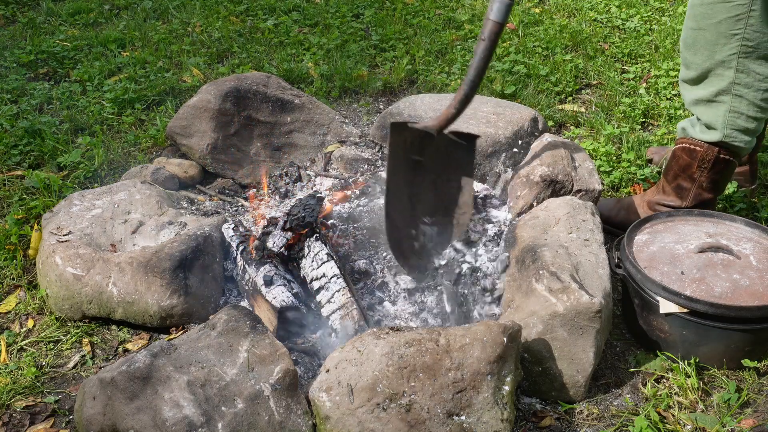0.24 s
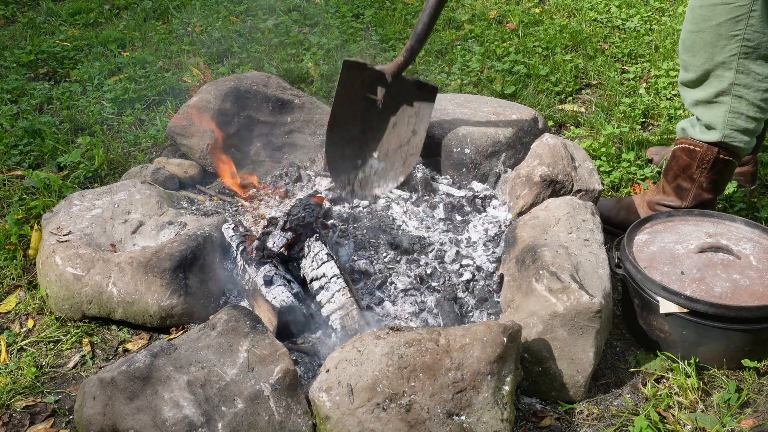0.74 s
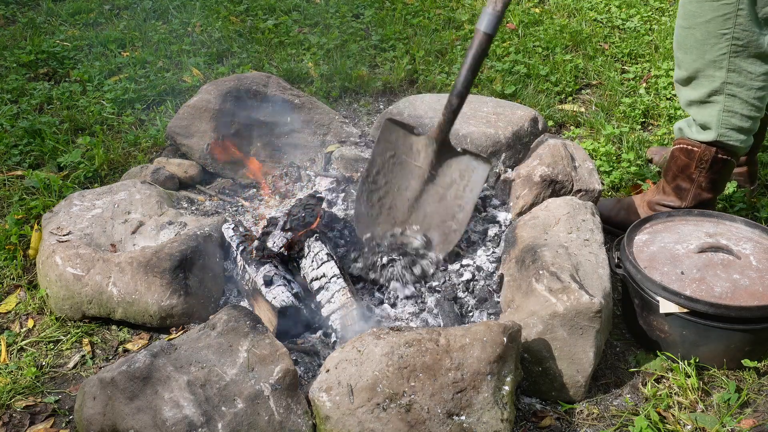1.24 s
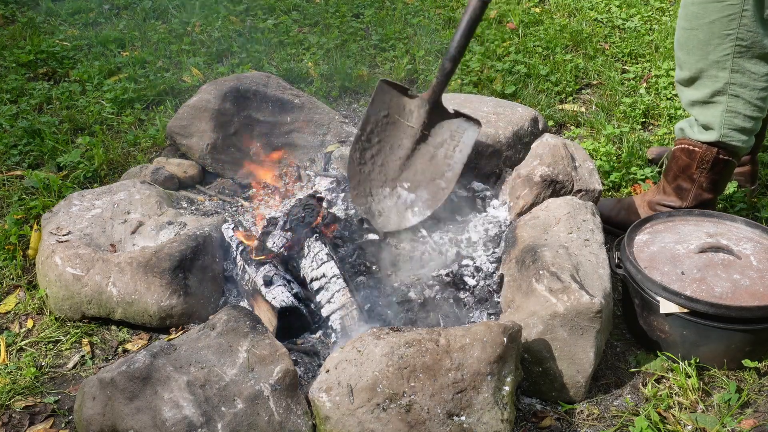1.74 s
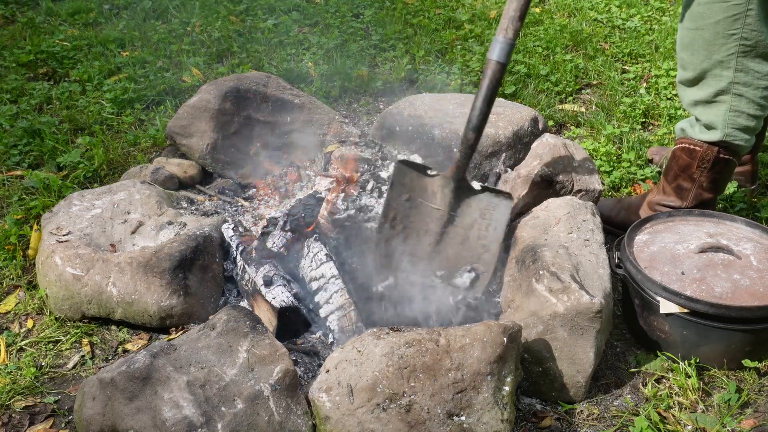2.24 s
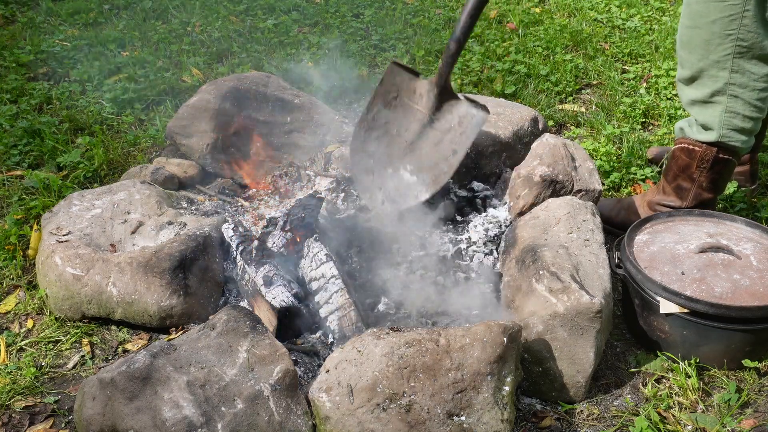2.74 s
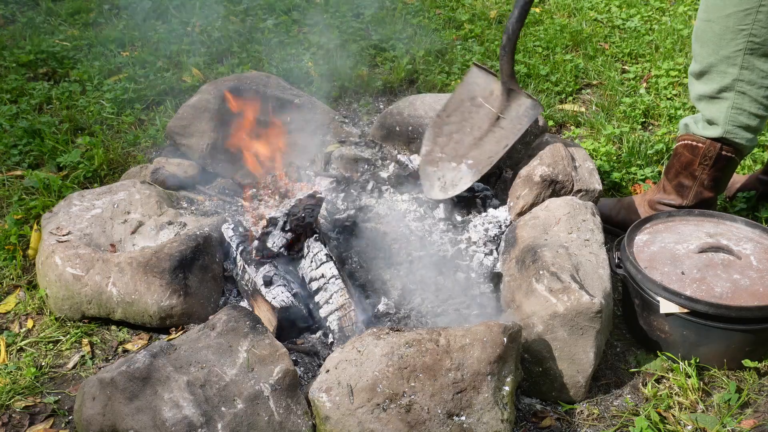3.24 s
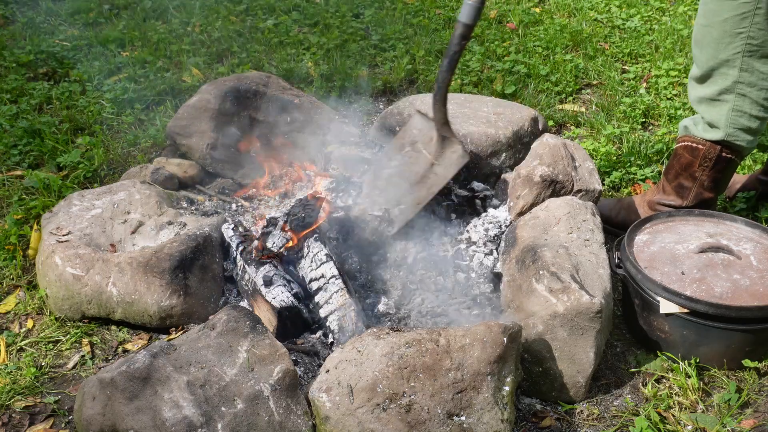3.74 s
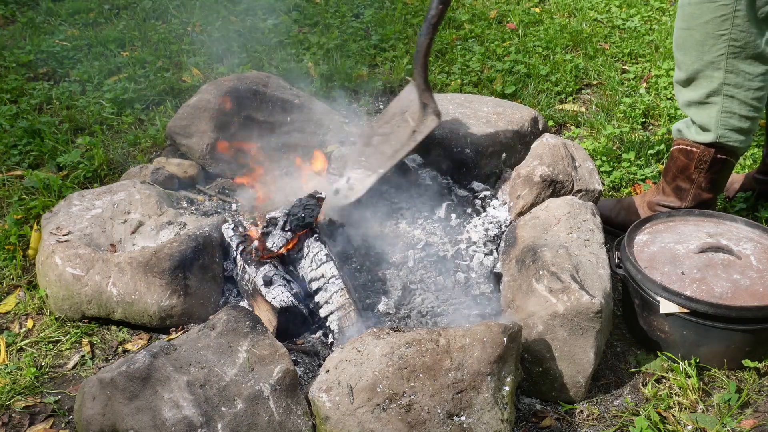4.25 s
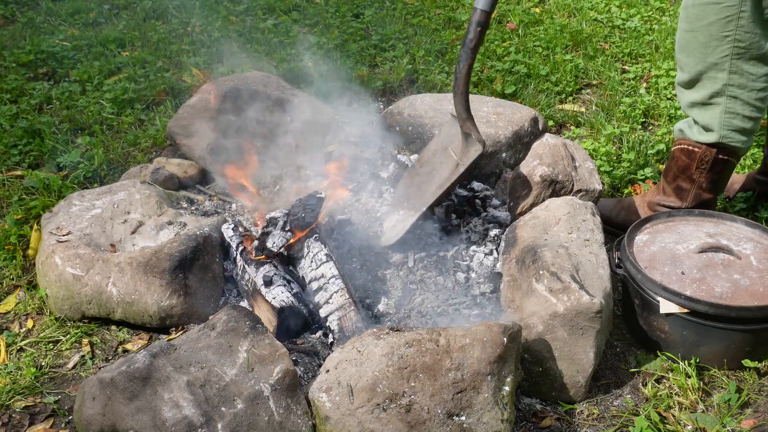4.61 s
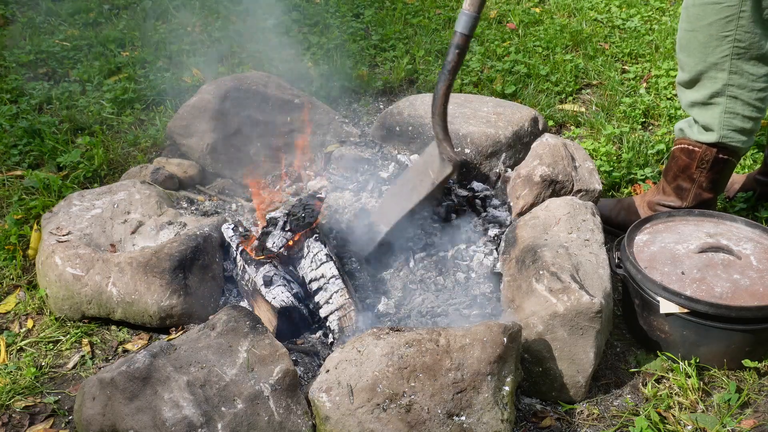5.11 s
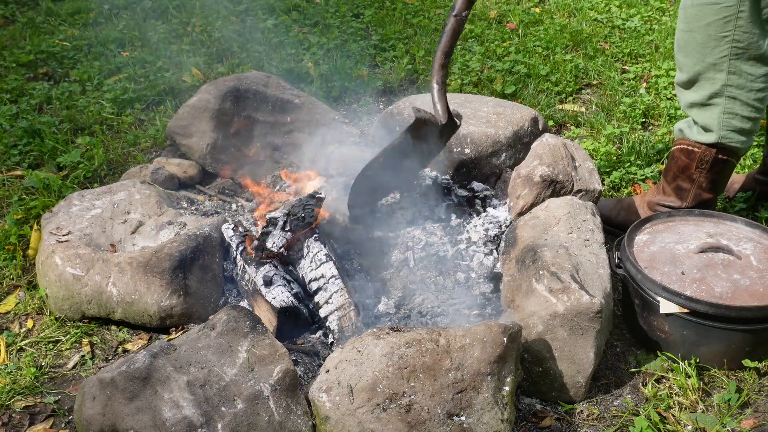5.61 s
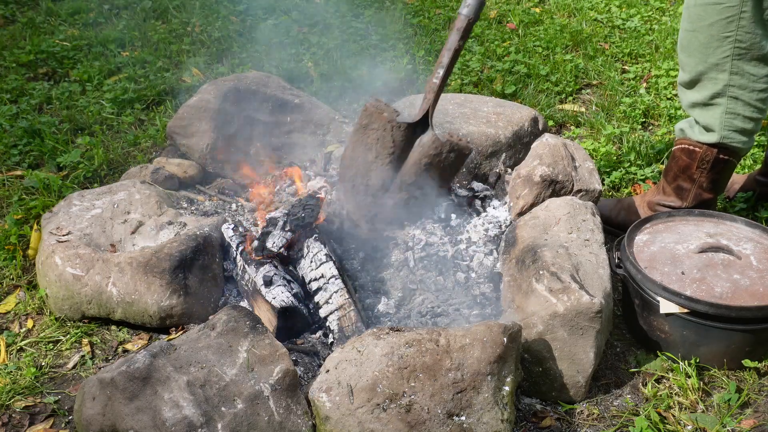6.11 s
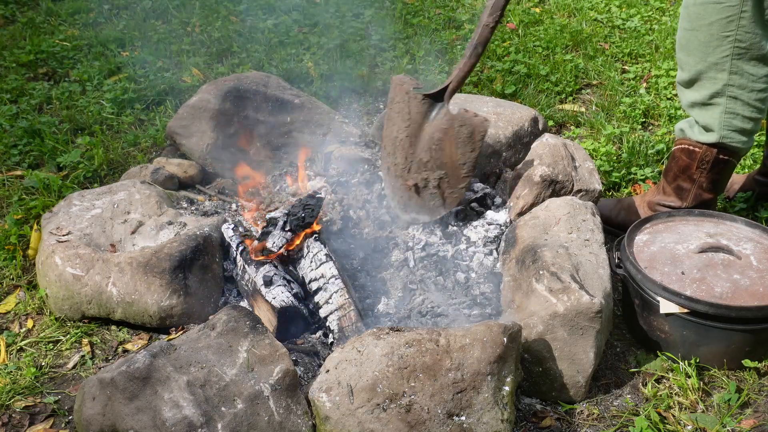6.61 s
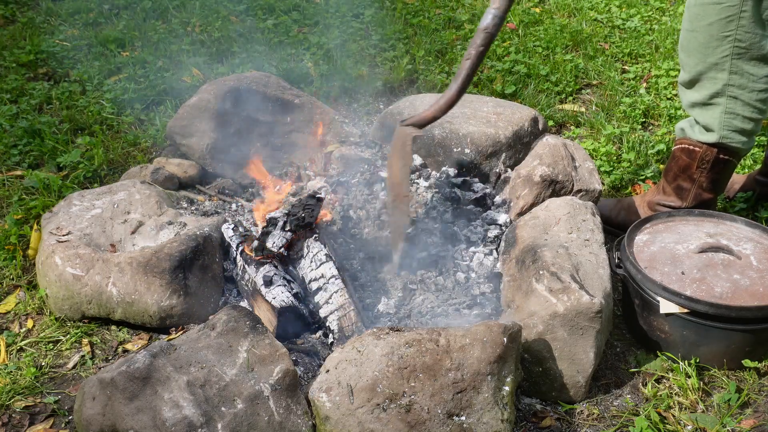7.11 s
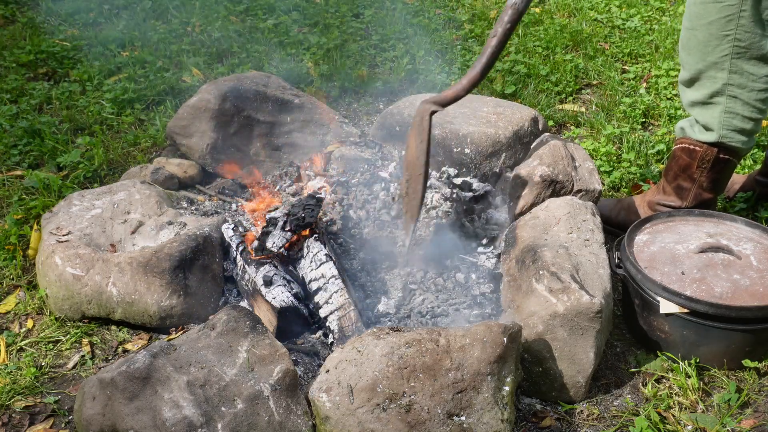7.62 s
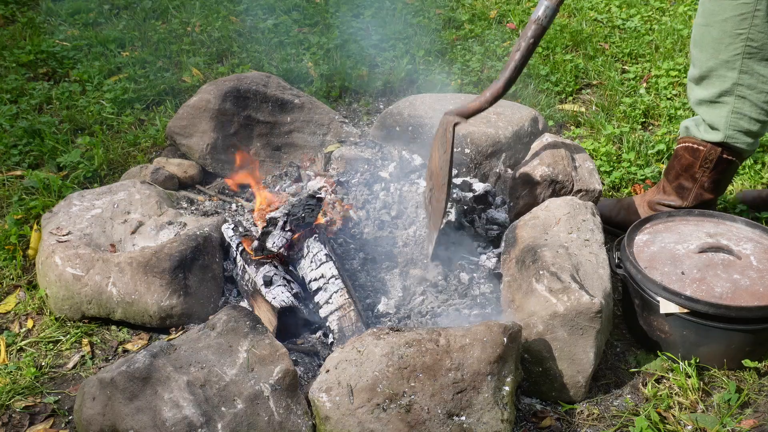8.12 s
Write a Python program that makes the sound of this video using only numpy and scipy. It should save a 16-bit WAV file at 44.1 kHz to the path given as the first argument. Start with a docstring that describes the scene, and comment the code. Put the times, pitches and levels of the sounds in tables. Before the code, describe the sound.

Outdoors, insects keep up a high trill over a soft hush while wind thumps and rumbles on the microphone. In front, a metal shovel works through coals in uneven, gritty strokes, with lumps knocking on the ringing blade and bits of charcoal tinkling. The digging starts hard and turns gentler, broken by short pauses and dry cracks from the embers. Around the middle, a distant bird and a faint whistle come and go.

```python
"""Outdoors at a stone fire ring, a steel spade is dragged and jabbed through ash and charcoal.
Crushed coals rattle the blade, lumps knock on it, and it rings on when it lifts free. Bits of
charcoal tinkle, and the embers crack, sizzle and tick. Insects trill in the grass with their wings,
a far bird and a faint whistle come and go, and gusts rumble on the microphone over a soft hush."""
import sys
import numpy as np
from scipy import signal
from scipy.fft import rfft, irfft, next_fast_len
from scipy.io import wavfile
from scipy.ndimage import map_coordinates

SR = 44100
rng = np.random.default_rng(int(sys.argv[2]) if len(sys.argv) > 2 else 0)


def to_wav(s):
    """Save 16-bit WAV."""
    ch = np.atleast_2d(s).T  # columns
    pcm = np.round(np.clip(ch, -1, 1) * 32767)  # PCM
    wavfile.write(sys.argv[1], SR, pcm.astype(np.int16))


N = 368674
TOP_HZ = 15950


def amp(db):
    """Turn decibels into a gain to multiply by."""
    return 10 ** (np.asarray(db) / 20)


def unit(x):
    """Scale each row to an average (rms) level of 1."""
    return x / np.sqrt(np.mean(np.abs(x) ** 2, axis=-1, keepdims=True) + 1e-20)


def colour(points, hz):
    """A tone curve through (Hz, dB) points, silent beyond its ends."""
    point_hz, db = np.transpose(points)
    return amp(np.interp(np.log(hz + 1), np.log(point_hz), db, left=-120, right=-120))


def hump(hz, centre_hz, octaves):
    """A tone curve that favours the frequencies near a centre."""
    return 1 / (1 + (np.log2((hz + 1) / centre_hz) / octaves) ** 2)


def wobble(rate, n):
    """A smooth curve through `rate` random values a second."""
    return map_coordinates(rng.standard_normal(int(n * rate / SR) + 4), [np.arange(n) * rate / SR])


def filtered(x, response):
    """Shape x with a tone curve that keeps white noise equally strong; adds room for a tail."""
    size = next_fast_len(x.shape[-1] + SR // 3)
    return irfft(rfft(x, size) * unit(response(np.fft.rfftfreq(size, 1 / SR))), size)


def add(track, s, x):
    """Mix x into the track at s seconds, dropping what falls outside."""
    start = round(s * SR)
    x = x[..., max(-start, 0):]
    part = track[..., max(start, 0):][..., :x.shape[-1]]
    part += x[..., :part.shape[-1]]


def spread(mid, side, side_db, pan_db):
    """Make left and right from a shared part (mid) and an opposed part (side)."""
    side = amp(side_db) * side
    return np.array([(mid + side) * amp(pan_db / 2), (mid - side) * amp(-pan_db / 2)])


def rush(spectrum, side_db, pan_db):
    """Steady stereo noise with the given tone curve."""
    mid, side = filtered(rng.standard_normal((2, N)), lambda hz: colour(spectrum, hz))[:, :N]
    return spread(mid, side, side_db, pan_db)


def swell(t, rise_s, fall_s, drop_db=26.5, roundness=1.22):
    """A gain of 1 at t = 0 that is drop_db lower one rise before and one fall after."""
    return amp(-drop_db * np.maximum(-t / rise_s, t / fall_s) ** roundness)


def swells(rows):
    """Join overlapping swells into one gain curve."""
    t = np.arange(0, N, 32) / SR
    s, db, rise_s, fall_s = np.transpose(rows)[..., None]
    joined = np.linalg.norm(amp(db) * swell(t - s, rise_s, fall_s), axis=0)
    return np.interp(np.arange(N) / SR, t, joined)


def grains(n, rate, scatter_db):
    """Tiny random impacts of uneven size, about `rate` a second."""
    sizes = amp(scatter_db * np.clip(rng.standard_normal(n), -2, 2)) * rng.choice([-1, 1], n)
    return unit(sizes * (rng.random(n) < rate / SR))


def patchy(x, depth_db, clump_s=0.012, clump_hz=700):
    """Each clump of coal breaks with its own tone: a random gain over time and frequency."""
    spectra = signal.stft(x, nperseg=256)[2]
    step = np.array([SR / 256 / clump_hz, 128 / SR / clump_s])
    grid = np.indices(spectra.shape) * step[:, None, None]
    patches = map_coordinates(rng.standard_normal(grid[:, -1, -1].astype(int) + 2), grid, order=1)
    gain = amp(depth_db * np.clip(patches, -1.5, 1.5))
    return signal.istft(spectra * gain / np.sqrt(np.mean(gain ** 2)), nperseg=256)[1][:len(x)]


def chips(n, rate, pitch_hz, pitch_spread, cycles):
    """Charcoal chips ring briefly at random times, each at its own pitch."""
    count = int(rate * n / SR) + 1
    pitch, size, life = rng.standard_normal((count, 3)).T[..., None]
    start = (n * rng.random((count, 1))).astype(int)
    hz = np.minimum(pitch_hz * np.exp(pitch_spread * pitch), TOP_HZ)
    age = np.arange(SR // 50)
    turns = hz * age / SR
    fade = np.exp(-turns / (cycles * np.exp(0.079 * life)))
    rings = amp(3.9 * np.clip(size, -2, 2)) * np.sin(2 * np.pi * turns) * fade
    return unit(np.bincount((start + age).ravel(), rings.ravel(), minlength=n)[:n])


def ring(hz, db, t60):
    """One fading tone. Its ring time, t60, is the seconds it takes to drop 60 dB."""
    t = np.arange(SR // 3) / SR
    return amp(db - 60 * t / t60) * np.sin(2 * np.pi * hz * t)


# The wind between gusts. Each row: time in seconds, strength in dB.
BREEZE = [(0, -26), (.6, -46.5), (1.7, -63), (2.6, -49), (3.1, -62), (3.5, -51), (4.05, -70), (4.7, -40.5),
          (5.8, -40.5), (7, -35.5), (7.5, -43.5), (8.36, -36.5)]
# Gusts. Each row: peak time in seconds, strength in dB, rise and fall in seconds.
GUSTS = [(.13, -28.5, 0.29, 0.55), (.8, -27, 0.1, 0.24), (1.35, -28, 0.4, 0.35), (1.88, -43.5, 0.35, 0.61),
         (2.21, -37.5, 0.16, 0.082), (3.37, -36.5, 0.043, 0.037), (3.62, -42, 0.14, 0.22),
         (4.24, -43.5, 0.13, 0.17), (4.52, -37.5, 0.22, 0.33), (4.9, -33, 0.37, 0.69),
         (5.43, -38, 0.18, 0.14), (6.02, -36, 0.2, 0.49), (6.45, -27.5, 0.2, 0.46), (6.73, -23, 0.055, 0.2),
         (7.28, -32, 0.47, 0.23), (8, -28, 1, 1)]
# The tone of steady wind. Each row: frequency in Hz, relative level in dB.
RUMBLE_TONE = [(15, -43), (25, -16), (50, 3), (100, 5), (190, -13), (250, -25), (450, -41)]
# The tone of eddies, the swirls in hard gusts. Each row: frequency in Hz, relative level in dB.
EDDY_TONE = [(50, -20), (110, 6), (185, 2.5), (260, -10.5), (400, -24), (700, -57)]
def wind(rumble_db=-43, rumble_growth=0.73, eddy_db=-49, eddy_growth=1.29, flutter_db=2.5):
    """Gusts ride on the breeze and rumble on the microphone; hard ones add higher-pitched eddies."""
    breeze_db = np.interp(np.arange(N) / SR, *np.transpose(BREEZE)) - 1
    strength_db = 20 * np.log10(np.hypot(amp(breeze_db), swells(GUSTS)))
    excess_db = strength_db + flutter_db * wobble(25, N) + 42  # above a light wind of -42 dB
    rumble = amp(rumble_db + rumble_growth * excess_db) * rush(RUMBLE_TONE, side_db=-22, pan_db=0)
    eddies = amp(eddy_db + eddy_growth * excess_db) * rush(EDDY_TONE, side_db=-17.5, pan_db=-1)
    return rumble + eddies


# The tone of the hush. Each row: frequency in Hz, relative level in dB.
AIR_TONE = [(20, 8.5), (60, 19.5), (120, 11), (220, 12.5), (400, 3.5), (1000, 0), (2000, 1), (3400, 2.5),
            (5300, -3), (6300, -7.5), (9000, -15.5), (15500, -11.5)]
# Its stereo width. Each row: frequency in Hz, level of the side against the mid in dB.
AIR_WIDTH = [(20, -34), (300, -8), (1500, -7.5), (3000, -7.5), (6000, 2.5), (16000, 2)]
def air(air_db=-52.5):
    """The hush of the open air, widest in the treble."""
    mid, side = filtered(rng.standard_normal((2, N)), lambda hz: colour(AIR_TONE, hz))
    width = colour(AIR_WIDTH, np.fft.rfftfreq(len(side), 1 / SR))
    side = irfft(rfft(side) * width, len(side))
    return amp(air_db) * np.array([mid + side, mid - side])[:, :N]


def trill(strokes_per_s, depth):
    """Wing strokes make the level pulse at a slightly unsteady rate."""
    turns = np.cumsum(strokes_per_s * (1 + 0.069 * wobble(4.5, N))) / SR
    return unit(1 + depth * np.sin(2 * np.pi * turns))


# The tones of the two insect choruses. Each row: frequency in Hz, relative level in dB.
CRICKET_TONE = [(3500, -37), (3950, -6.5), (4150, 4.5), (4350, 3), (4600, -8), (5200, -15.5)]
KATYDID_TONE = [(6000, -24.5), (6750, -10.5), (7150, 0), (7450, 4), (8050, 0.5), (8300, -8.5),
                (8600, -21.5), (9500, -30)]
def insects(cricket_db=-53, katydid_db=-46):
    """Crickets and higher-pitched katydids trill steadily in the grass."""
    drift = amp(0.7 * wobble(6, N))
    crickets = rush(CRICKET_TONE, side_db=-10, pan_db=-3.5) * trill(strokes_per_s=75, depth=0.11)
    katydids = rush(KATYDID_TONE, side_db=-5, pan_db=-3) * trill(strokes_per_s=51, depth=0.092)
    return crickets * drift * amp(cricket_db) + katydids * amp(katydid_db)


# The blade's natural tones. Each row: pitch in Hz, dB above the crunch, ring time in seconds.
BLADE_MODES = [(720, 3.5, 0.14), (815.4, 10.5, 0.29), (834.5, 15.5, 0.15), (1191, 5.5, 0.14),
               (1342, 4, 0.078), (1445, 6, 0.12), (1573, 6.5, 0.086), (1629, 9, 0.1), (1750, 12.5, 0.095),
               (1822, 15, 0.24), (1926, 10, 0.084), (2113, 10.5, 0.17), (2383, 3, 0.086), (2500, 8, 0.14),
               (2707, 11, 0.17), (2736, 6.5, 0.1), (2884, 4.5, 0.037), (2960, 10, 0.09), (3278, 9.5, 0.1),
               (3580, 5, 0.18), (3805, 2, 0.1), (4570, 7, 0.066)]
# The dry crunch of coal. Each row: frequency in Hz, relative level in dB.
CRUNCH_TONE = [(150, 11.5), (420, 0), (650, 0), (1000, -4), (1500, -3.5), (2300, -3.5), (3000, -2),
               (4000, 1.5), (5200, -4), (7000, -9), (10000, -10.5), (16000, -21)]
def blade(vary_db=2.5, detune=0.0029):
    """A tone curve of crunch and ringing steel: the contact spot varies its levels, ash its pitches."""
    modes = []
    for pitch, db, t60 in BLADE_MODES:
        pitch *= 1 + detune * rng.standard_normal()
        gain = amp(db + vary_db * rng.standard_normal())
        width_hz = np.log(1000) / np.pi / t60
        modes.append((pitch, gain, width_hz))

    def response(hz):
        ringing = sum(gain * 1j * hz * width / (pitch ** 2 - hz ** 2 + 1j * hz * width)
                      for pitch, gain, width in modes)
        return colour(CRUNCH_TONE, hz) * (1 + ringing)
    return response


# Pushes of the spade. Each row: time of the hardest push in seconds, strength in dB, rise and fall
# in seconds, dB added for the deep bite, dB added for the fine grit, centre of the tone in Hz.
STROKES = [(.041, -23, 0.19, 0.063, -6.5, -7.5, 2080), (.105, -21.5, 0.065, 0.045, -2.5, -5.5, 2750),
           (.16, -41, 0.19, 0.58, -3, -5.5, 1960), (.736, -29.5, 0.019, 0.058, -11, -7.5, 3200),
           (.843, -25.5, 0.088, 0.099, -7, -16, 3070), (.868, -31, 0.026, 0.055, 1.5, -5.5, 2400),
           (1.16, -44.5, 0.46, 0.22, -3, -7, 2520), (1.227, -31.5, 0.041, 0.13, -9.5, -13, 2940),
           (1.355, -42.5, 0.16, 0.23, -4.5, -14, 2400), (1.967, -38, 0.068, 0.11, -16, -9, 3040),
           (2.105, -36, 0.24, 0.18, -8, -20, 2600), (2.212, -36, 0.15, 0.09, 2, -6.5, 2700),
           (2.36, -46, 0.21, 0.18, -7, -14, 2900), (2.458, -41.5, .05, 0.063, -15, -5, 3200),
           (2.521, -41, 0.31, 0.084, -8.5, -22, 2700), (3.383, -34.5, 0.075, 0.096, -8, -17, 2330),
           (3.615, -34.5, 0.085, 0.26, -9, -18, 2600), (3.674, -30, 0.071, 0.13, -13.5, -9, 2900),
           (3.8, -43, 0.24, 0.28, -7.5, -13, 2400), (4.905, -41, 0.052, 0.15, -20, -13, 2800),
           (5.266, -37.5, 0.19, 0.15, -13.5, -9.5, 2900), (5.525, -39.5, 0.14, 0.14, -14, -17, 2100),
           (5.555, -26.5, 0.033, 0.019, -31, -13.5, 2280), (5.988, -34.5, 0.071, 0.069, -7, -14, 2980),
           (6.152, -39, 0.12, 0.071, -13, -15, 2580), (6.34, -39, 0.22, 0.29, -14.5, -12, 2590),
           (7.066, -38.5, 0.024, .019, -16, -15, 3000), (7.245, -38, 0.15, 0.072, -7.5, -13, 3320),
           (7.38, -45.5, 0.14, 0.19, -12, -1, 2000), (7.932, -37, 0.096, 0.16, -11, -12, 2500)]
def scraping(scrape_db=-2, bite_db=-3, grit_db=-1.5, chip_db=-8, clump_db=2.5, split_hz=1150):
    """Coals break under the edge, a deep bite wakes the low tones, and cinders hiss on the steel."""
    def high_and_low(hz):
        tilt = (hz / split_hz) ** 8
        return np.array([tilt, np.ones(len(hz))]) / (1 + tilt)

    out, t = np.zeros(N), np.arange(-SR // 3, SR // 2) / SR
    for s, db, rise, fall, bite, _, centre_hz in STROKES:
        steel = blade()
        breaks_per_s = 750 * amp(db + 38)  # a harder push breaks more coals
        clumps = amp(clump_db * wobble(130.3, len(t)))
        force = unit(clumps * patchy(grains(len(t), breaks_per_s, scatter_db=2), depth_db=5))
        high = amp(scrape_db) * swell(t, rise, fall)
        low = amp(bite + bite_db) * swell(t / 0.89, rise, fall)  # the bite is a little shorter
        bands = filtered(force * np.array([high, low]),
                         lambda hz: steel(hz) * hump(hz, centre_hz, octaves=1.73) * high_and_low(hz))
        add(out, s + t[0], amp(db) * bands.sum(axis=0))
    hiss = swells([(s, db + grit, rise, fall) for s, db, rise, fall, _, grit, _ in STROKES])
    clumps = amp(clump_db * wobble(110, N))
    cinders = unit(clumps * patchy(grains(N, rate=1000, scatter_db=1.5), depth_db=6.5))
    add(out, 0, cinder_hiss(cinders * hiss * amp(grit_db)))
    push = swells([row[:4] for row in STROKES])
    loose_coals = chips(N, rate=120, pitch_hz=2884, pitch_spread=0.24, cycles=30)
    return out + push * amp(chip_db) * loose_coals


# The tone of fine grit. Each row: frequency in Hz, relative level in dB.
GRIT_TONE = [(3000, -5), (6000, 1), (9000, 0), (12000, -4.5), (16000, -8)]
def cinder_hiss(impacts):
    """Fine cinders striking the steel make only treble."""
    return filtered(impacts, lambda hz: colour(GRIT_TONE, hz))


# Lumps of coal and stone meet the blade. Each row: start in seconds, relative level in dB,
# centre of the tone in Hz, its width in octaves.
KNOCKS = [(0.0118, -17, 1570, 0.38), (0.0338, -15, 1850, 0.49), (0.0978, -10, 1700, 1.1),
          (.268, -33, 1630, 0.35), (0.7039, -15, 2840, 0.4), (.714, -7.5, 3600, 0.86),
          (0.7352, -20, 3400, 1.4), (.783, -20, 2860, 0.2), (0.801, -27, 3400, .7),
          (.968, -26.5, 3000, 1.4), (1.036, -29.5, 2900, 0.44), (1.112, -30, 3000, .77),
          (1.153, -23.5, 3100, 0.38), (1.173, -23, 2500, 0.53), (1.22, -18, 2750, 0.37),
          (1.247, -22.5, 2580, 0.53), (1.275, -28, 2900, .3), (1.343, -25.5, 2680, 1.4),
          (1.366, -34.5, 2220, 0.15), (1.9643, -18.5, 3170, .45), (2.056, -26.5, 2780, 0.24),
          (2.098, -32, 2900, 0.43), (2.183, -25, 2340, 0.34), (2.215, -21, 3000, 0.88),
          (2.218, -25.5, 895, 0.45), (2.349, -30, 2760, 0.25), (3.361, -23, 2670, 0.099),
          (3.385, -22.5, 2050, 0.82), (3.643, -25, 2740, 0.12), (3.667, -28, 2900, 0.43),
          (5.259, -24, 4040, 0.19), (5.261, -34.5, 1607, 0.038), (5.266, -30, 3200, .6),
          (5.552, -27, 1780, 0.28), (6.145, -31, 1750, 0.35), (6.285, -26.5, 3500, 1.1),
          (6.412, -24.5, 3280, 0.74), (7.153, -31.5, 2790, 0.69), (7.2342, -26, 3020, 0.64),
          (7.265, -28, 3170, 0.39), (7.3829, -24, 1500, 0.59), (7.759, -29, 2230, 0.47),
          (7.795, -26.5, 2940, 0.89), (7.882, -31.5, 1890, 0.37), (7.925, -27, 3030, .3)]
def knocks(knock_db=-1, crush_t60=0.013, give_s=0.0013):
    """A lump gives way against the blade in a dense, brief crush, then crumbles."""
    out, t = np.zeros(N), np.arange(SR // 10) / SR
    lead = SR // 500  # room for the filter to spread ahead of the hit
    for s, db, centre_hz, octaves in KNOCKS:
        crumble_t60 = 0.038 / np.sqrt(octaves)  # a narrow, ringing contact lasts longer
        fade = amp(-60 * t / crush_t60) + amp(-60 * t / crumble_t60)
        force = fade * grains(len(t), rate=9000, scatter_db=2.5) * (1 - np.exp(-t / give_s))
        steel = blade()
        hit = filtered(np.pad(force, (lead, 0)), lambda hz: steel(hz) * hump(hz, centre_hz, octaves))
        add(out, s - lead / SR, hit * amp(db + knock_db) / np.abs(hit).max())
    return out


# Sudden thumps of wind. Each row: peak time in seconds, relative level in dB.
BUFFETS = [(.022, -17.5), (.097, -19), (.155, -22), (.182, -11), (0.374, -25), (1.081, -25.5),
           (1.464, -14.5), (4.509, -28.5), (4.813, -29), (6.14, -29), (6.324, -20), (6.363, -20.5),
           (6.443, -14), (6.718, -16.5), (6.745, -13.5), (7.83, -18.5), (7.926, -16), (7.97, -19),
           (8.056, -15)]
def buffets(buffet_db=-1, half_length_s=0.009, pitch_ratio=0.98):
    """Single large eddies hit the microphone, a few quick cycles each."""
    out, t = np.zeros((2, N)), np.arange(-SR // 10, SR // 10) / SR
    for s, db in BUFFETS:
        puff = rng.standard_normal((2, len(t))) * np.exp(-(t / half_length_s) ** 2)
        mid, side = filtered(puff, lambda hz: colour(EDDY_TONE, hz / pitch_ratio))
        thump = spread(mid / np.abs(mid).max(), side / np.abs(side).max(), side_db=-20, pan_db=-0.5)
        add(out, s + t[0], thump * amp(db + buffet_db))
    return out


# Falling charcoal. Each row: start in seconds, relative level in dB, pitch in Hz, ring time in seconds.
TINKLES = [(0.041, -14.5, 10450, 0.0084), (.062, -19, 9350, 0.023), (.137, -22, 3650, 0.063),
           (.19, -39, 8500, 0.45), (0.289, -30, 4930, 0.028)]
def tinkles(tinkle_db=-2):
    """Brittle bits of charcoal each ring with one clean tone as they fall."""
    out = np.zeros(N)
    for s, db, hz, t60 in TINKLES:
        add(out, s, ring(hz, db + tinkle_db, t60))
    return out


# The blade comes free of the ash. Each row: start in seconds, relative level in dB.
LIFTS = [(.11, -50), (.885, -59), (1.25, -47), (2.22, -51), (2.47, -53), (3.39, -51.5), (7.95, -57)]
def lifted_blade(ring_db=1.5, ring_stretch=2.77, vary_db=2, rise_s=0.013):
    """With no ash to muffle it, the blade's longest tones sing on."""
    out, t = np.zeros(N), np.arange(SR * 2 // 3) / SR
    for s, db in LIFTS:
        tone = np.zeros(len(t))
        for hz, mode_db, t60 in BLADE_MODES:
            fade = amp(mode_db + vary_db * rng.standard_normal() - 60 * t / (ring_stretch * t60))
            tone += t60 * fade * np.sin(2 * np.pi * (hz * t + rng.random()))
        tone /= np.std(tone[:SR // 50])
        add(out, s, amp(db + ring_db) * tone * (1 - np.exp(-t / rise_s)))
    return out


# Embers crack and cinders snap. Each row: start in seconds, relative level in dB, pitch in Hz,
# width in octaves.
CRACKS = [(0.188, -19, 6240, 0.36), (.219, -21.5, 6000, 0.71), (1.8135, -39, 12000, .8),
          (2.214, -22, 10000, 1), (2.627, -37, 14500, .3), (3.027, -22, 7200, 0.36), (3.781, -29, 9000, .8),
          (3.9545, -36, 13000, .6), (4.158, -38, 520, 0.4), (4.4768, -33.5, 7000, 2.2),
          (5.2343, -11, 4020, 0.28), (5.773, -30.5, 4000, 0.63), (6.366, -25, 7000, 0.86),
          (6.527, -26, 4960, 0.98), (6.678, -30.5, 10400, 0.54), (6.7235, -34, 10000, .5),
          (7.3925, -34, 12000, .6), (7.7339, -14.5, 5750, 2.1), (7.7747, -21, 7000, 1.1),
          (7.7945, -22, 7000, 0.99), (8.272, -26, 4420, 0.72)]
# Freshly uncovered embers sizzle. Each row: peak time in seconds, level in dB, rise and fall
# in seconds, centre of the tone in Hz.
SIZZLES = [(1.965, -43, 0.046, .06, 14000), (2.458, -51, 0.033, 0.05, 11500),
           (2.942, -38, 0.028, 0.03, 8400), (3.05, -61.5, 0.24, 0.51, 12700),
           (7.38, -48.5, 0.083, 0.098, 13500)]
def embers(crack_db=1, snap_t60=0.00088, tail_t60=0.054, tail_db=-24, tick_db=-72):
    """Gas pockets burst with a dry snap, raked embers sizzle, and tiny ticks go on all the while."""
    out, t = np.zeros(N), np.arange(SR // 20) / SR
    for s, db, pitch_hz, octaves in CRACKS:
        fade = amp(-60 * t / snap_t60) + amp(tail_db - 60 * t / tail_t60)
        burst = np.pad(rng.choice([-1, 1], len(t)) * fade, (SR // 500, 0))
        snap = filtered(burst, lambda hz: hump(hz, pitch_hz, octaves))[:len(t)]
        add(out, s - 1 / 500, snap * amp(db + crack_db) / np.abs(snap).max())
    fizz = patchy(grains(N, rate=900, scatter_db=-1), depth_db=7)
    for *shape, centre_hz in SIZZLES:
        add(out, 0, filtered(swells([shape]) * fizz, lambda hz: hump(hz, centre_hz, octaves=0.22)))
    return out + amp(tick_db) * chips(N, rate=16, pitch_hz=11300, pitch_spread=0.18, cycles=4)


# Taps of the spade. Each row: start in seconds, relative level in dB.
TAPS = [(3.8289, -13), (3.907, -27), (3.9633, -25)]
# The tones of a tap. Each row: pitch in Hz, relative level in dB, ring time in seconds.
HOLLOW_MODES = [(847, -20, 0.077), (1657, -2.5, 0.096), (1740, -4.5, 0.046), (1940, -10.5, 0.13),
                (2680, -6.5, 0.032), (3200, -17, 0.06)]
def hollow_taps(tap_db=-8, contact_db=-12, contact_t60=0.024, cushion_s=0.0009):
    """The lightly held spade rings hollow; ash cushions the touch, so it has little treble."""
    out, t = np.zeros(N), np.arange(SR // 3) / SR
    cushion = 1 - np.exp(-t / cushion_s)
    ringing = sum(ring(*mode) for mode in HOLLOW_MODES)
    for s, db in TAPS:
        touch = rng.standard_normal(len(t)) * amp(contact_db - 60 * t / contact_t60)
        contact = filtered(touch, lambda hz: colour(CRUNCH_TONE, hz) * hump(hz, 1600, octaves=1))
        add(out, s, amp(db + tap_db) * cushion * (contact[:len(t)] + ringing))
    return out


# Bird notes. Each row: start and length in seconds, starting pitch in Hz, relative level in dB.
BIRD_NOTES = [(4.09, 0.29, 3650, -57), (4.702, 0.47, 3610, -54), (5.282, .19, 3450, -53)]
def bird(sag_hz_per_s=480, waver_hz=18, flicker_db=4):
    """A far bird whistles thin notes that fade in and out while their pitch sags."""
    out, t = np.zeros(N), np.arange(SR // 2) / SR
    for s, length, hz, db in BIRD_NOTES:
        pitch = hz - sag_hz_per_s * t + waver_hz * wobble(67, len(t))
        level = amp(db - flicker_db + flicker_db * wobble(35, len(t)))
        fade = np.sin(np.pi * np.minimum(t / length, 1))
        add(out, s, level * fade * np.sin(2 * np.pi * np.cumsum(pitch) / SR))
    return out


# Swells of a whistle. Each row: peak time in seconds, level in dB, rise and fall in seconds.
WHISTLE_SWELLS = [(4.72, -55.5, 0.65, 1), (5.09, -50.5, 0.25, 0.6), (5.66, -52.5, .13, .1),
                  (5.93, -54, 0.099, 0.075)]
def far_whistle(pitch_hz=1255, flicker_db=3):
    """A faint whistle, a narrow band of noise, comes and goes."""
    flicker = unit(amp(flicker_db * wobble(18, N)))
    whistle = filtered(rng.standard_normal(N), lambda hz: hump(hz, pitch_hz, octaves=0.045))[:N]
    return swells(WHISTLE_SWELLS) * flicker * whistle


def stone_echo(x, t60=0.068, treble_hz=8000):
    """The ring of stones throws back a brief scatter of echoes, mostly treble."""
    t = np.arange(SR // 8) / SR
    scatter = rng.standard_normal(len(t)) * amp(-60 * t / t60)
    tail = filtered(scatter, lambda hz: 0.019 + hz ** 2 / (hz ** 2 + treble_hz ** 2))[:len(t)]
    return signal.fftconvolve(x, tail / np.linalg.norm(tail))[:N]


def scene():
    """The fire pit sits just right of centre, widened by its echo, in the open air."""
    pit = scraping() + lifted_blade() + knocks() + tinkles() + hollow_taps() + embers()
    stereo_pit = spread(pit, stone_echo(pit), side_db=-15.5, pan_db=-1)
    return stereo_pit + far_whistle() + bird() + insects() + wind() + buffets() + air()


def record(dry):
    """Cut away all the treble above TOP_HZ."""
    size = next_fast_len(N + SR // 4)
    kept = np.fft.rfftfreq(size, 1 / SR) < TOP_HZ
    return irfft(rfft(dry, size) * kept, size)[:, :N]


dry = scene()
out = record(dry)
to_wav(out)
```